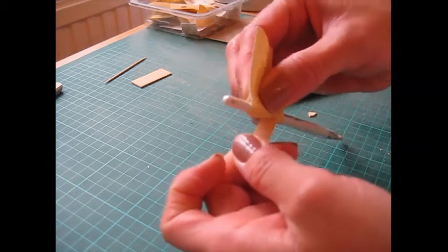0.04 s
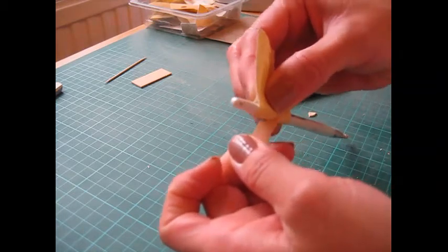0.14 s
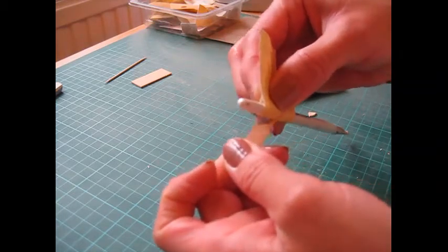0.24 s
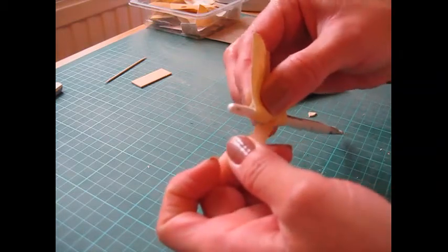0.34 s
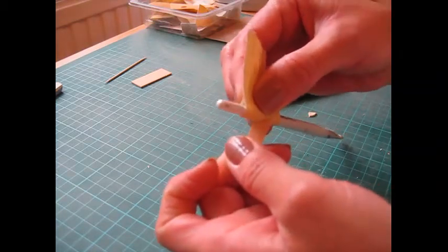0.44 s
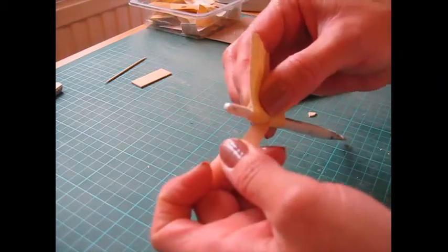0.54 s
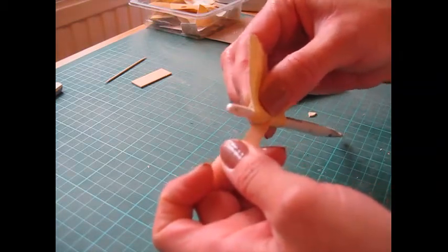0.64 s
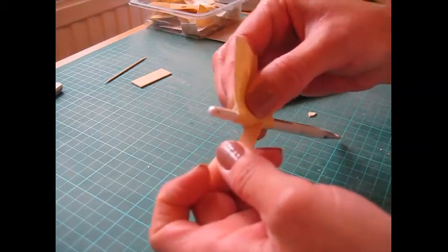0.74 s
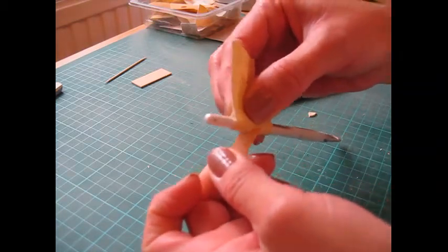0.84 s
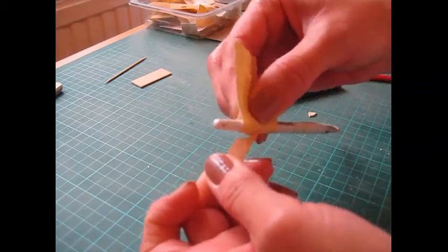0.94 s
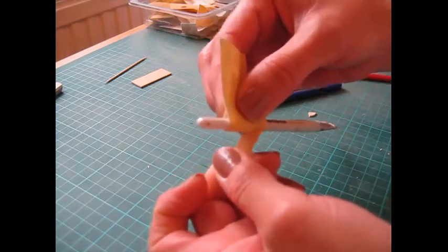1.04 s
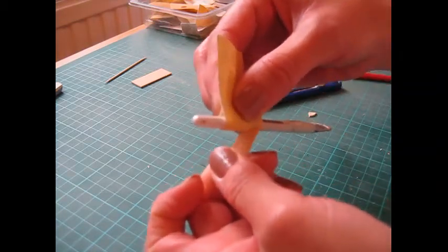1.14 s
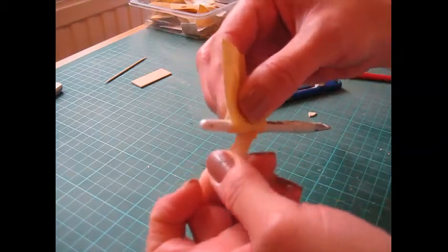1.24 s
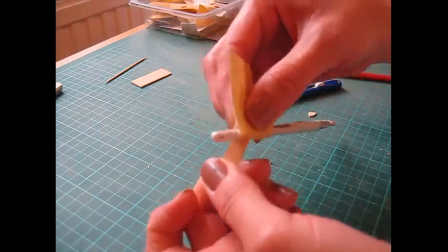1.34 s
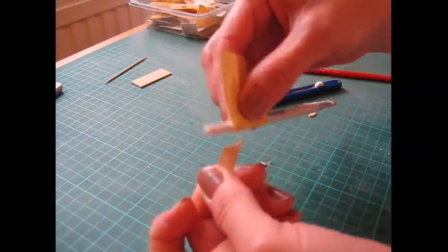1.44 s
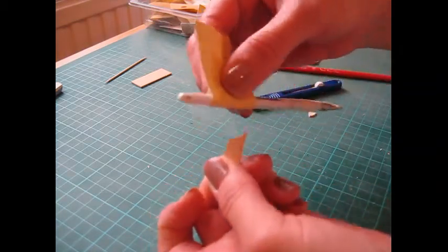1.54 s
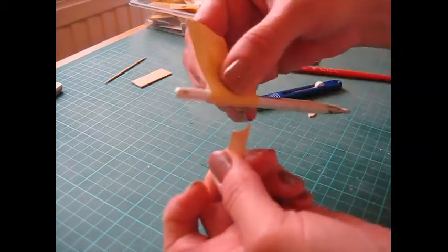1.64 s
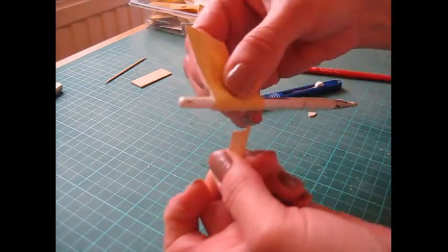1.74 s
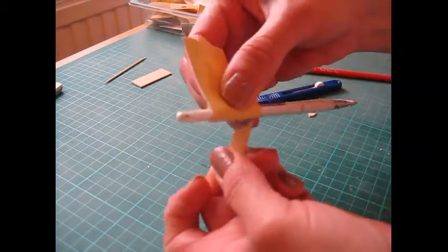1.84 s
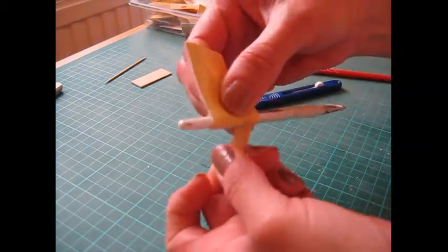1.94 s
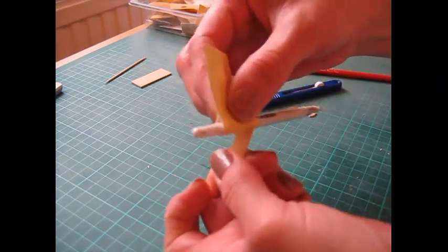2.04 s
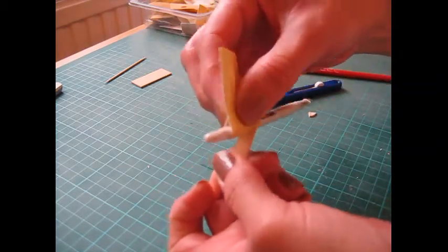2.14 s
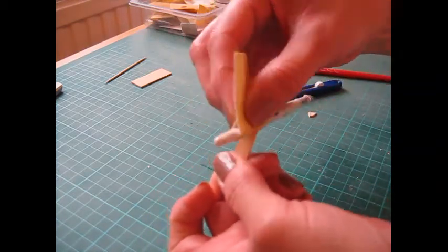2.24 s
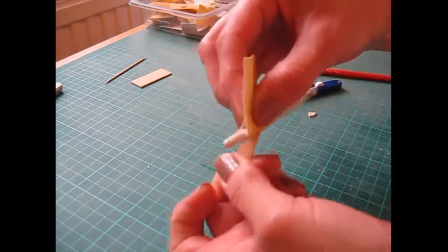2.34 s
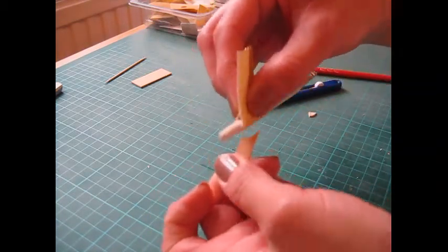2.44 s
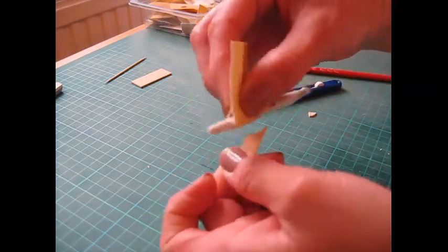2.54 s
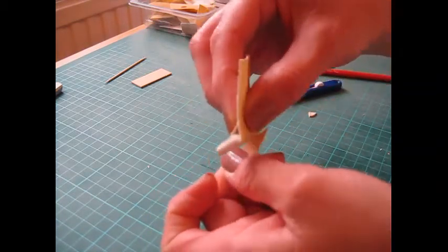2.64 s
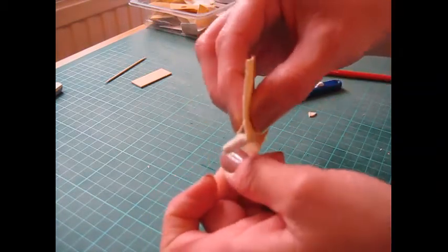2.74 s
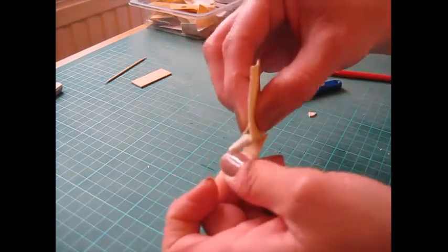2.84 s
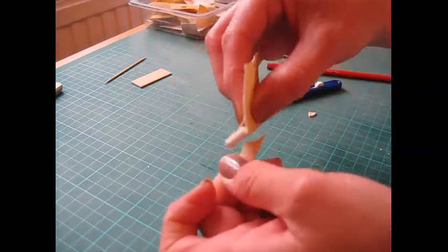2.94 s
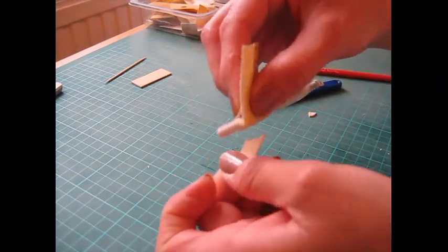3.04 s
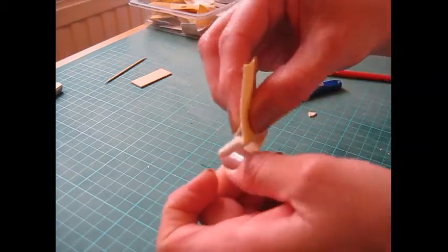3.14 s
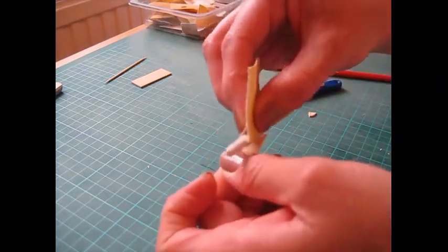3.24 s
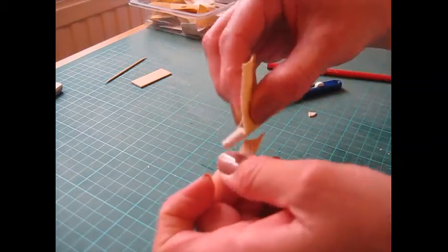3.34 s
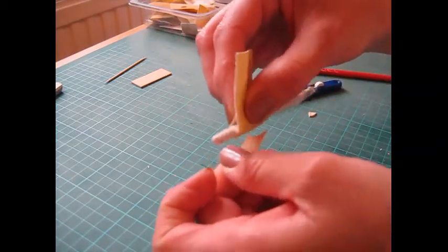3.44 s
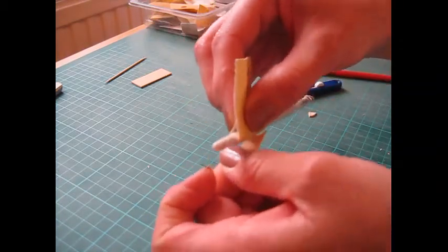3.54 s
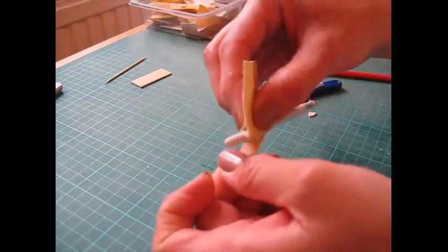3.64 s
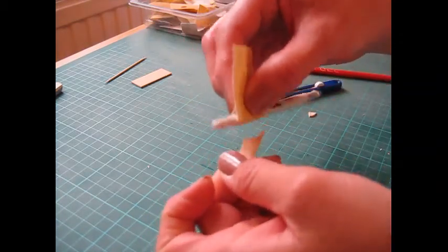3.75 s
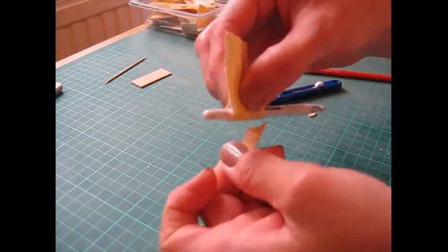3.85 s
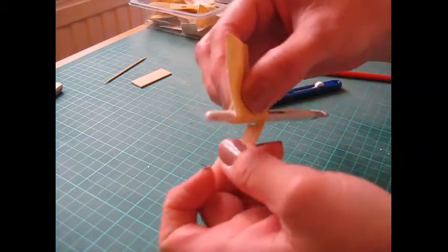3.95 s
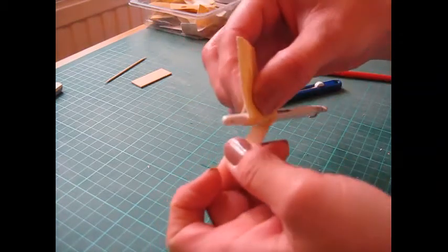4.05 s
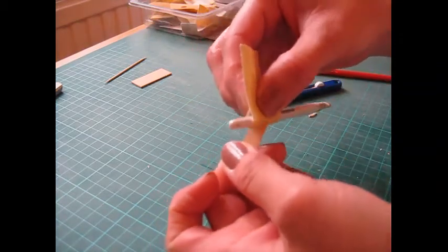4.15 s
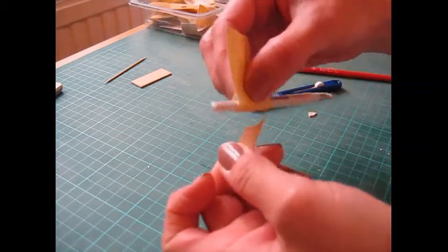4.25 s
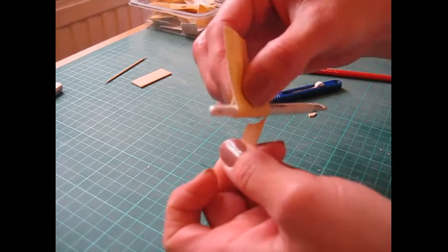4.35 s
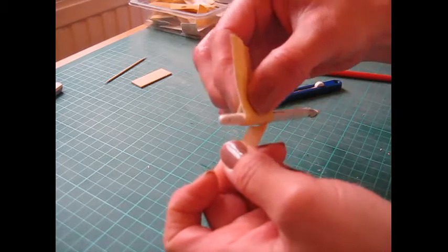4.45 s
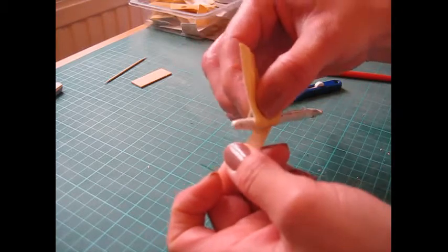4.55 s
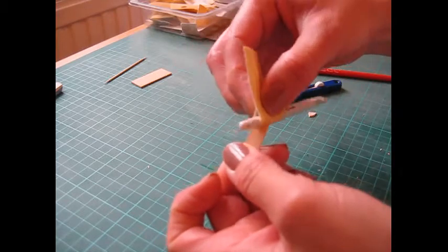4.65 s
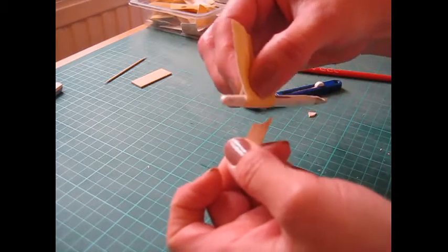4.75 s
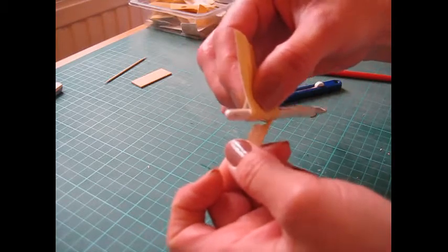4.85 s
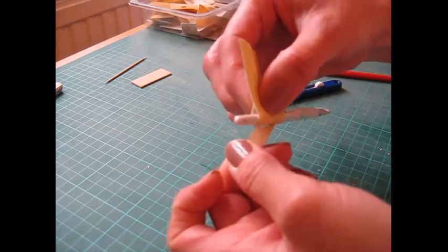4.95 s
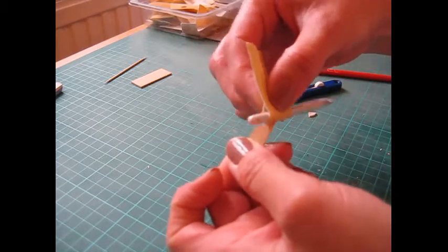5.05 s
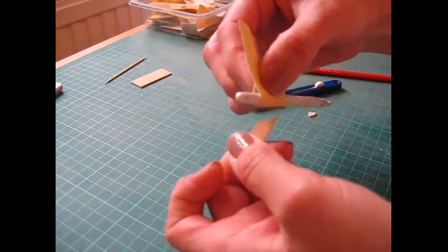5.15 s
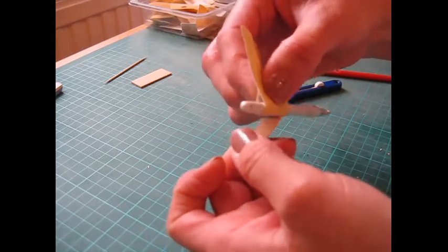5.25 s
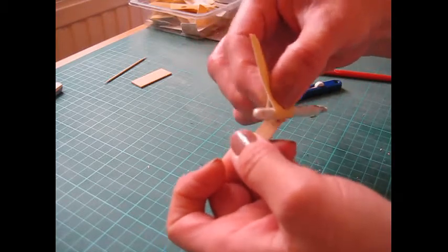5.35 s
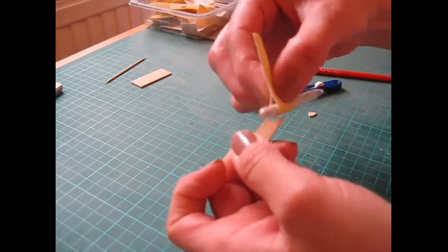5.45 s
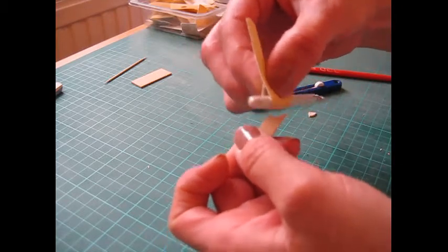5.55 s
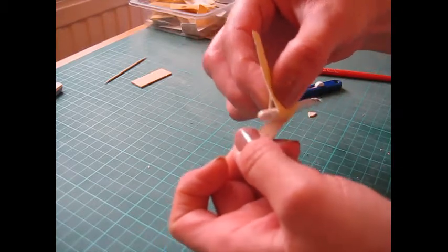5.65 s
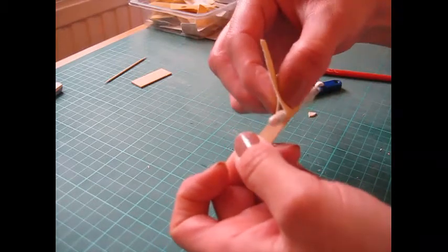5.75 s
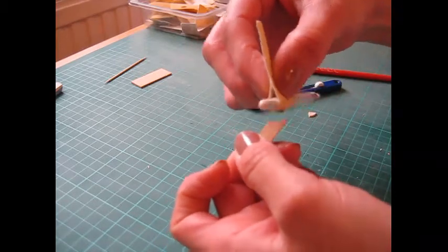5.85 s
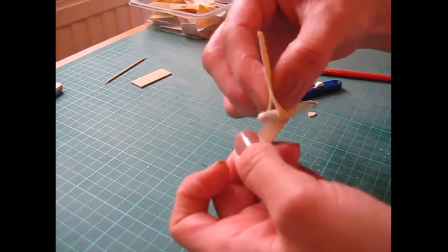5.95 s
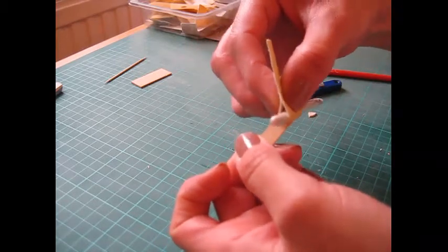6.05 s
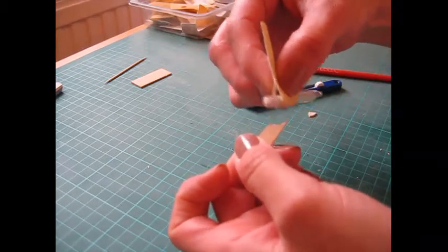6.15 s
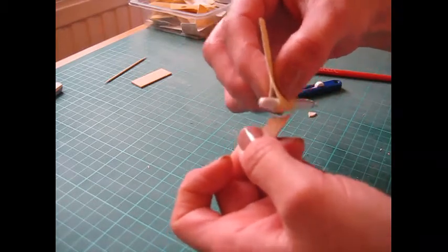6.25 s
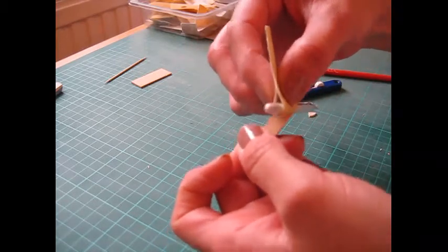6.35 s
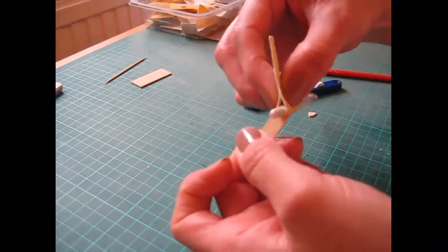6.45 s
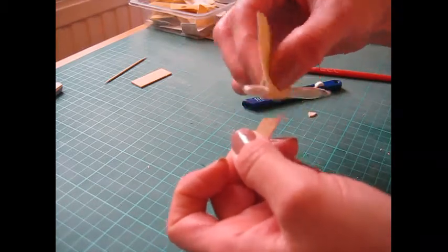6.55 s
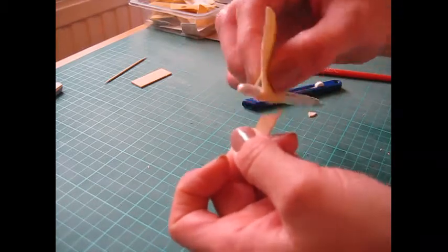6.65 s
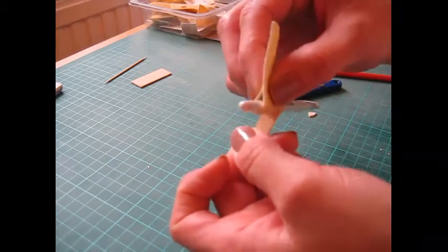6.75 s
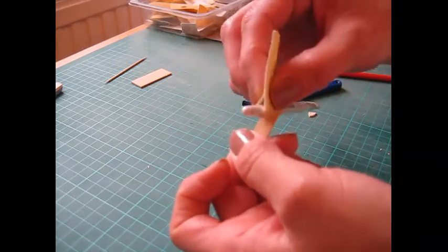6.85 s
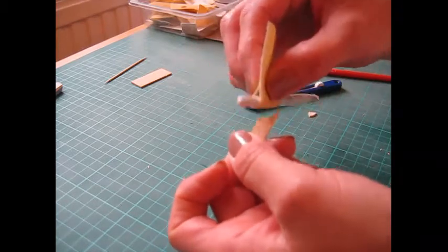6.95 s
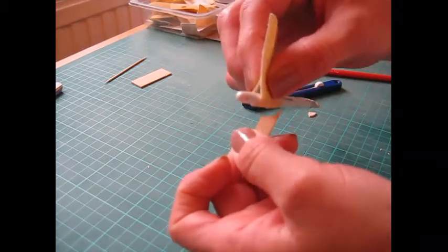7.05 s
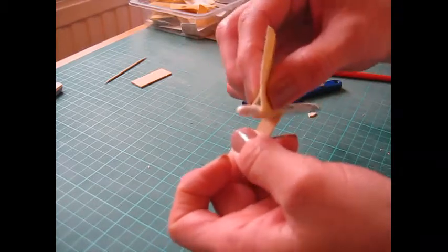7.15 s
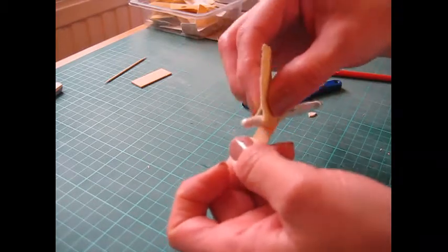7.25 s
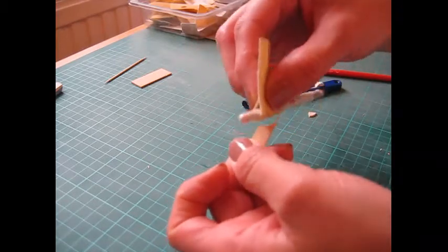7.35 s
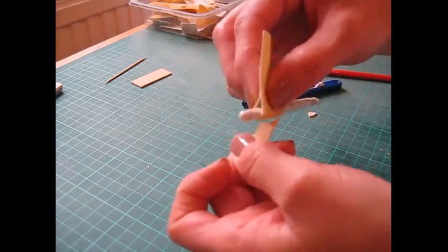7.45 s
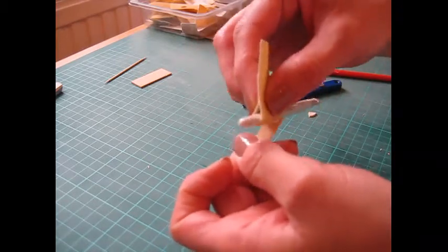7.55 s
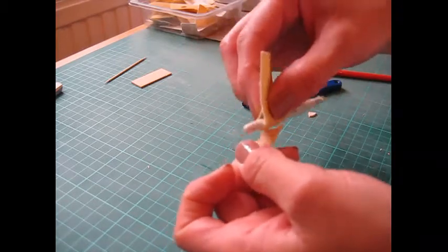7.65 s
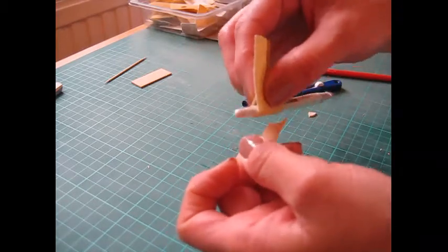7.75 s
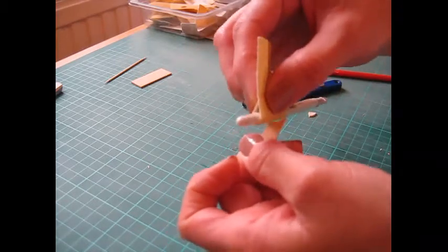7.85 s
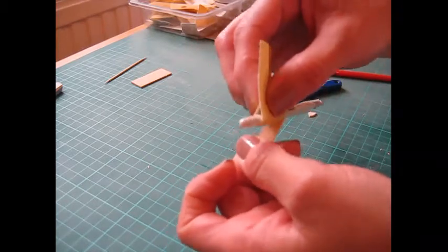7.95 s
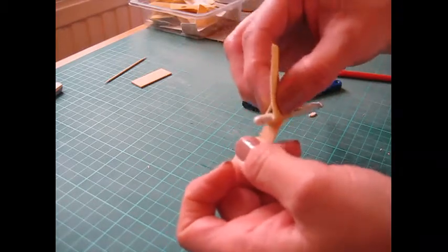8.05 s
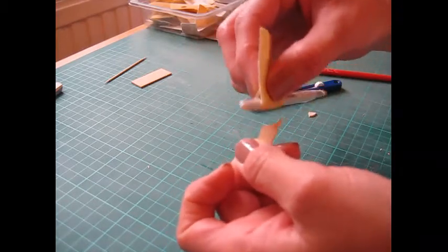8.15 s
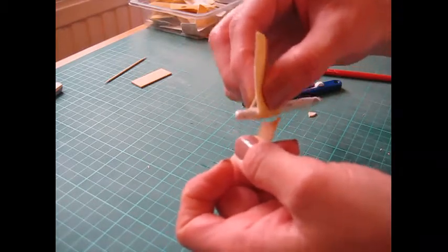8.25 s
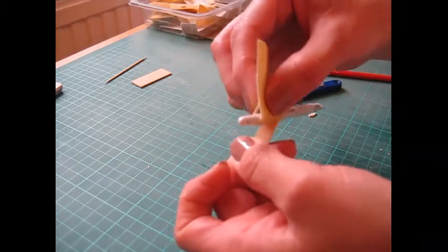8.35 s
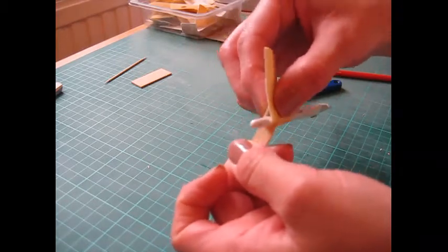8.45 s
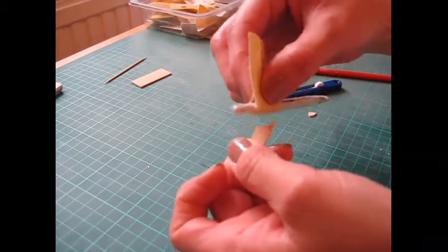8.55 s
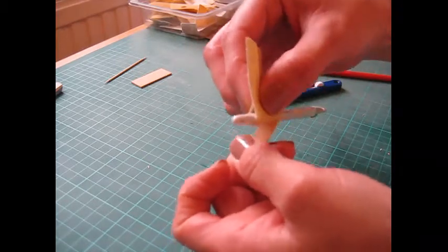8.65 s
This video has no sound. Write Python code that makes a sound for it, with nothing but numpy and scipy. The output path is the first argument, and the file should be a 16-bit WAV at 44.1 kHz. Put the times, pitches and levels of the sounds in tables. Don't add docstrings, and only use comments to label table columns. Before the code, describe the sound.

Hand sanding at an indoor craft table: light gritty touches, two firmer scrapes, a pause with scattered crackles, then repeated brief scratchy strokes, each about a fifth of a second. Some start with crisp snaps, and two small dull taps occur midway. The sound is close, thin, papery and woody, with little room tail, and low camera hiss fills the gaps.

```python
import sys
import numpy as np
from scipy import signal
from scipy.fft import rfft, irfft
from scipy.io import wavfile
from scipy.ndimage import uniform_filter1d, minimum_filter1d, map_coordinates

SR = 44100
rng = np.random.default_rng(int(sys.argv[2]) if len(sys.argv) > 2 else 0)


def boost_factor(decibels):
    exponent = np.asarray(decibels, float) / 20
    return 10 ** exponent


def output_pcm(signal):
    pcm = np.clip(np.atleast_2d(signal).T, -1, 1) * 32767
    wavfile.write(sys.argv[1], SR, np.round(pcm).astype(np.int16))


N = 383229

# hz, level_db
HISS_HZ_DB = [(20, -3), (120, 0.5), (260, 1), (430, 0), (1260, -3), (3000, -7), (7000, -13), (10500, -15.5),
              (15700, -16.5)]
# time_s, peak_db
SNAPS = [(0.987, -22), (1.0152, -25), (1.0776, -23), (1.0967, -21), (1.201, -23), (2.1328, -14.5),
         (2.1512, -17.5), (2.169, -22), (2.1918, -21), (2.196, -19), (2.2275, -23), (2.2395, -11.5),
         (2.2697, -12), (2.2974, -12.5), (2.3026, -9), (2.319, -11), (2.3282, -10.5), (2.351, -26),
         (2.7545, -20.5), (3.954, -11.5), (3.9701, -11.5), (4.4296, -13.5), (4.447, -11.5), (4.8979, -16),
         (4.9082, -14.5), (5.3142, -26), (5.367, -14), (5.6422, -15), (6.32, -31), (7.3022, -22),
         (0.001, -34), (0.0099, -26.5), (0.388, -20.5), (0.42, -34), (1.1785, -33), (1.9311, -38),
         (1.9455, -34), (2.042, -34), (2.051, -31.5), (2.06, -38), (2.089, -30.5), (2.12, -42),
         (3.047, -41), (3.142, -41), (3.163, -28.5), (3.446, -44), (3.503, -37), (5.239, -38), (5.298, -23),
         (5.905, -35.5), (6.3078, -24.5), (6.595, -39), (6.755, -20), (7.0983, -36), (7.1284, -32),
         (7.897, -33), (8.2804, -33.5), (8.646, -39)]
# start_s, end_s, grain_count, typical_peak_db
CRACKLES = [
    (.391, .43, 5, -30),
    (.72, .77, 7, -28),
    (1.072, 1.082, 2, -20),
    (2.205, 2.255, 5, -19),
    (2.333, 2.348, 2, -16),
    (3.963, 3.985, 4, -15),
    (3.988, 4.03, 6, -26),
    (4.432, 4.5, 11, -17),
    (4.91, 4.915, 1, -17.5),
]
# start_s, end_s, pressure_db, landing_rel_db, gather_s
RUBS = [(0.104, 0.262, -57.5, 6, 0.022), (0.309, 0.356, -44.5, -9.5, 0.028),
        (0.356, 0.431, -55.5, 5.5, .02), (0.482, 0.587, -64, 17, 0.054), (0.668, 0.764, -56, -5, 0.016),
        (0.816, 0.934, -55, -12, 0.044), (1.636, 1.662, -45, 2, .01), (1.945, 1.961, -46, -12, 0.0082),
        (2.129, 2.315, -36, -7, 0.15), (2.658, 2.729, -43.5, -3.5, .03), (3.953, 4.03, -48.5, 8.5, 0.06),
        (7.473, 7.513, -64.5, 5, .02)]
# start_s, end_s, pressure_db, landing_rel_db, gather_s
STROKES = [(0.982, 1.089, -35, -16, .05), (1.166, 1.385, -31, -24.5, 0.051),
           (2.332, 2.422, -33.5, -4, 0.01), (2.752, 2.935, -35.5, -13.5, 0.032),
           (3.161, 3.338, -37.5, -24, 0.033), (3.543, 3.71, -36.5, -14, 0.022),
           (4.029, 4.204, -34, -18, 0.018), (4.431, 4.671, -31.5, -19, 0.073),
           (4.904, 5.075, -35, -8, 0.036), (5.302, 5.439, -38.5, -9, 0.019),
           (5.636, 5.77, -38.5, -7.5, 0.013), (5.957, 6.113, -38.5, -10, 0.028),
           (6.31, 6.478, -35.5, -4, 0.031), (6.702, 6.911, -35.5, -22, 0.062),
           (7.132, 7.302, -36, -5, 0.02), (7.515, 7.685, -37.5, -10.5, 0.0073),
           (7.902, 8.094, -34.5, -14, 0.024), (8.316, 8.487, -34.5, -11, 0.037)]
# grit_fizz_db, paper_ring_db, low_stick_mode_db, high_stick_mode_db
GRIPS = [(10.5, 1, 1, -1.5), (10.5, 0.5, -1, -3), (6.5, -2, -8.5, 2), (12.5, 0, -15, -1.5), (9, 0, -16, -2),
         (16, 5, -6, -12), (-3, -5.5, -5, 6), (5.5, 2, 2, 1), (1.5, 0.5, -5.5, -4), (-1.5, 0, -17, 9),
         (5, -2, -13, -6), (9, 2.5, -2.5, 1.5), (10.5, 3, 0, -4), (4.5, 1.2, 0.2, -8), (3.5, -0.5, -2, -16),
         (4, 1.5, -12, 1.5), (4, 1.5, -11, 5.5), (3.5, -2.5, -26, 2.5), (5, 1.5, -0.5, -15),
         (6, 0.8, -2, -19), (8.5, 2, -3, -8), (11, 3.5, 0.5, -8), (10.3, 3, 0, -7), (10.5, 1.7, 0.5, -9),
         (9, 2, 3.5, 0.5), (6, 1.5, 1, -5), (6.5, 0, -4.5, -4), (8, -0.5, -8, -2), (6, -0.5, -4, -2.5),
         (4.5, 1.2, -6, -6)]
# fizz_top_db, fizz_gain_by_end_db, lift_off_rel_db, pen_body_db
WRISTS = [(-4, -1, -8, 3), (-2, 7, -4, 3), (0, -2, -14, 0), (-8, 13, -10, 0.3), (-8, -10, -15, 6),
          (-12, -3, -11, 3), (0.1, 0.1, -9, -5), (-6, 0.1, -5.5, -2), (-5, 16, -17, -2.5),
          (-2, -5, -7, -2.5), (-1, 5, -31, 1), (-6, -5, -4, 2), (-6, -17, -7.5, 6.5), (-7, 1, -8.5, 1),
          (-7, -2, -13.5, -2), (-1, 5, -9, -2.8), (3, 8, -5.5, -2), (2.5, 6.5, -6, -3.5),
          (-4.5, -2.5, -5, -2.1), (-1, -8.5, -18, -3), (0.5, -3.5, -7, -2.7), (2.5, -4, -15, -1.7),
          (1.5, -1, -10, -1), (3.5, -2.5, -13.5, 0), (2.5, 0, -13.5, 0), (0.5, 4, -6.5, 1.5),
          (1, 7.5, -13.5, 1.5), (3, 8.5, -14, 2.5), (1.5, 0.5, -12.5, -1), (-3.5, 1, -12, -2.2)]
# at_speed_db, extra_landing_db, extra_lifting_db
PAPER_MIX_DB = (-0.3, 1.5, 3.5)
FIZZ_MIX_DB = (0.1, 0.5, 1)
PEN_MIX_DB = (-10, 6.5, 11)
# centre_hz, width_hz, level_db
STICK_MODES = [(2955, 620, -0.5), (3722, 1110, 1.5), (4410, 850, 0)]
PAPER_MODES = [(4994, 1020, -1), (5990, 2200, 0), (7300, 2130, -9.5)]
GRIT_MODES = [(9330, 2960, 1), (10870, 5000, 5.5), (12320, 1100, 4), (14200, 5300, -8.5), (14640, 2660, 5)]
PEN_MODES = [(1030, 440, -11), (1745, 910, -1.5), (2248, 700, 1)]
# start_s, length_s
LOST = [(0.37, 0.018), (0.48, 0.02), (0.536, 0.034), (2.092, .016), (2.715, 0.024), (3.342, 0.023),
        (3.783, 0.023), (4.104, 0.019), (4.175, 0.021), (4.331, 0.024), (4.759, 0.02), (4.915, 0.021),
        (5.986, 0.025), (6.048, 0.031), (7.539, 0.038), (8.053, 0.019), (8.215, 0.027)]
# centre_hz, width_hz, depth_0_to_1
DIPS = [
    (5530, 280, .85),
    (2820, 260, 0.25),
]
# time_s, level_db
KNOCKS = [
    (4.458, -14.5),
    (5.3676, -18.5),
]

EDGE_HZ = 15790


def evened(x):
    return x / np.sqrt(np.mean(x ** 2) + 1e-20)


def slow(size):
    noise = rng.standard_normal(N)
    return evened(uniform_filter1d(uniform_filter1d(noise, size), size))


def hiss(level_db=-55):
    hz = np.fft.rfftfreq(N, 1 / SR)
    colour_hz, colour_db = np.transpose(HISS_HZ_DB)
    noise = rng.standard_normal(N) * boost_factor(0.52 * slow(size=60) + 1.47 * slow(size=4000))
    colour = boost_factor(np.interp(np.log(hz + 1), np.log(colour_hz + 1), colour_db))
    return boost_factor(level_db) * evened(irfft(rfft(noise) * colour, N))


def grains(crackle_spread_db=1.5):
    rows = SNAPS
    for start_s, end_s, count, typical_db in CRACKLES:
        count = round(count)
        jitter, size = rng.random(count), rng.standard_normal(count)
        times_s = start_s + (end_s - start_s) * (np.arange(count) + 0.45 * jitter) / count
        rows = rows + list(zip(times_s, typical_db + crackle_spread_db * size))
    return rows


def snaps():
    push, rows = np.zeros((4, N + 200)), grains()
    t = np.arange(200) / SR
    for (time_s, peak_db), rattle in zip(rows, rng.standard_normal((len(rows), 4, 200))):
        burst = 0.3 * rattle * np.exp(-t / 0.00043) + (t == 0)
        push[:, round(time_s * SR):][:, :200] += boost_factor(peak_db) * burst
    body_db = np.array([[-1.5], [-3], [3], [-11]])
    return push[:, :N] * boost_factor(body_db)


def ring(x, modes, grip_db):
    hz = np.fft.rfftfreq(1024, 1 / SR)
    power = 0
    for (centre_hz, width_hz, level_db), extra_db in zip(modes, grip_db):
        power = power + boost_factor(level_db + extra_db) ** 2 / (1 + (2 * (hz - centre_hz) / width_hz) ** 2) ** 3
    cepstrum = irfft(np.log(power) / 2)
    cepstrum[1:512] *= 2
    cepstrum[513:] = 0
    kernel = irfft(np.exp(rfft(cepstrum)))
    return signal.oaconvolve(x, kernel / np.linalg.norm(kernel))[:len(x)]


def bodies(push):
    low_paper_share = 0.2
    pen_low_share = 1
    rows, out = sorted(zip(RUBS + STROKES, GRIPS, WRISTS)), np.zeros(N)
    middles = [round((one[0][1] + following[0][0]) / 2 * SR) for one, following in zip(rows, rows[1:])]
    borders = [0] + middles + [N]
    lags = rng.uniform(25, 110, (len(rows), 2, 1))
    for a, b, lag, (_, grip, wrist) in zip(borders, borders[1:], lags, rows):
        *_, low_db, high_db = grip
        top_db, *_, pen_db = wrist
        grips_db = ((low_db, 0, high_db), (low_paper_share * low_db, 0, 0),
                    (0, 0, top_db / 2, top_db, top_db), (pen_low_share * pen_db, 0, 0))
        modes = STICK_MODES, PAPER_MODES, GRIT_MODES, PEN_MODES
        direct = sum(ring(p[a:b], m, g) for p, m, g in zip(push, modes, grips_db))
        late = np.arange(b - a) - lag * (1 + .35 * (np.linspace(0, 1, b - a) - .5))
        echoes = [map_coordinates(direct, [n], order=3) for n in late]
        out[a:b] = 0.87 * direct + 0.215 * (echoes[0] - echoes[1])
    return out


def room(x, t60_s=0.154):
    t = np.arange(SR // 3) / SR
    tail = rng.standard_normal(len(t)) * boost_factor(-60 * t / t60_s) * (t > .002)
    tail = signal.lfilter([1], [1, -.25], tail)
    return signal.fftconvolve(x, tail / np.linalg.norm(tail))[:N]


def spill(x, jump_db=14, open_s=0.012, level_db=-7):
    power_db = 10 * np.log10(uniform_filter1d(x ** 2, size=128) + 1e-12)
    before_db = -minimum_filter1d(-power_db, size=600, origin=299)
    jump = (power_db[150:] - before_db[:-150] > jump_db) * 1.
    held = signal.oaconvolve(jump, np.ones(round(open_s * SR)))[:N]
    gate = uniform_filter1d(np.minimum(held, 1), size=100)
    top = signal.oaconvolve(x, signal.firwin(511, EDGE_HZ, pass_zero=False, fs=SR), "same")
    return boost_factor(level_db) * gate * top


def stroke_controls():
    gather_power = 1.7
    lift_s, drag_s = 0.012, 0.048
    uneven_run, uneven_land, uneven_lift = 0.25, 1, 0.56
    paper_fade_db = -3
    controls, contact = np.zeros((5, N)), np.zeros(N)
    for stroke, grip, wrist in zip(RUBS + STROKES, GRIPS, WRISTS):
        start_s, end_s, press_db, land_db, gather_s = stroke
        fizz_db, paper_db, *_ = grip
        _, gained_db, lift_db, pen_db = wrist
        on = slice(max(round(start_s * SR) - 100, 0), round(end_s * SR) + 100)
        t = np.clip(np.arange(on.start, on.stop) / SR, start_s, end_s)
        landing = np.exp(-((t - start_s) / gather_s) ** gather_power)
        lifting = np.exp((t - end_s) / lift_s)
        along = (t - start_s) / (end_s - start_s) - .5

        def mix(run, land, lift):
            return run + land * landing + lift * lifting

        controls[:, on] = [
            mix(press_db, land_db, lift_db),
            paper_db + mix(*PAPER_MIX_DB) + paper_fade_db * along,
            fizz_db + mix(*FIZZ_MIX_DB) + gained_db * along,
            pen_db + mix(*PEN_MIX_DB),
            mix(uneven_run, uneven_land * min(gather_s / drag_s, 1), uneven_lift)]
        contact[round(start_s * SR):round(end_s * SR)] = 1
    return *controls, uniform_filter1d(contact, size=160)


def scrape(catch_ms=0.37):
    stick_db, paper_db, fizz_db, pen_db, uneven, contact = stroke_controls()
    uneven = np.clip(uneven, 0, 1.6)
    chance = np.repeat(rng.standard_normal(N // 12 + 1), 12)[:N].clip(-3, 3)
    power = np.exp(2 * uneven * chance - 2 * uneven ** 2)
    decay = np.exp(-1000 / (catch_ms * SR))
    bursts = np.sqrt(signal.lfilter([1 - decay], [1, -decay], power))
    catches = bursts * contact * boost_factor(stick_db + 0.27 * slow(size=150))
    return np.array([catches * boost_factor(db + 0.76 * slow(size=500)) * rng.standard_normal(N)
                     for db in (0, paper_db, fizz_db, pen_db)])


def prolonged(past, count, size=13):
    z = rfft(past * np.hanning(len(past)), 8192)
    tops = signal.find_peaks(abs(z), distance=65)[0]
    weight = abs(z) * (np.arange(len(z)) + 50) ** .2
    tops = tops[np.argsort(-weight[tops])[:size]]
    n = np.arange(count)[:, None] + len(past)
    tones = (abs(z[tops]) * np.cos(2 * np.pi * tops * n / 8192 + np.angle(z[tops]))).sum(1)
    return evened(tones) * np.std(past) * boost_factor(2.0 - 70 * np.arange(count) / SR)


def mended(x, size=224):
    out = x.copy()
    for start_s, length_s in LOST:
        a, b = round(start_s * SR), round((start_s + length_s) * SR)
        fade = np.linspace(0, np.pi / 2, b - a)
        before = prolonged(x[a - size:a], count=b - a)
        after = prolonged(x[b:b + size][::-1], count=b - a)[::-1]
        bridge = np.cos(fade) * before + np.sin(fade) * after
        share = 0.84 * signal.windows.tukey(b - a, min(0.0086 / length_s, 1))
        out[a:b] = share * bridge + (1 - share) * x[a:b]
    return out


def pointing(x, from_s=2.55, to_s=3.85):
    out, on = x.copy(), slice(round(from_s * SR), round(to_s * SR))
    for hz, width_hz, depth in DIPS:
        peak = signal.lfilter(*signal.iirpeak(hz, hz / width_hz, SR), out[on])
        out[on] -= np.clip(depth, 0, 1) * peak
    return out


def knocks():
    out, t = np.zeros(N), np.arange(200) / SR
    for time_s, level_db in KNOCKS:
        out[round(time_s * SR):][:200] += boost_factor(level_db) * (t / 0.00019) * np.exp(-t / 0.000096)
    return out


def scene():
    near = pointing(bodies(scrape() + snaps())) + knocks()
    return (near + boost_factor(-15.0) * room(near) + hiss())[None]


def low_pass(x):
    return signal.sosfilt(signal.butter(12, 17060, fs=SR, output="sos"), x)


def record(dry):
    hz = np.fft.rfftfreq(8192, 1 / SR)
    edge = np.where(hz < EDGE_HZ, 1, boost_factor(-55 - .03 * (hz - EDGE_HZ)))
    band = signal.firwin2(2047, hz, edge * (hz < SR / 2), fs=SR)
    notch_hz, notch_q = 7875, 6.5
    x = signal.lfilter(*signal.iirnotch(notch_hz, notch_q, SR), dry[0])
    x = mended(signal.oaconvolve(x, band, "same") + spill(x))
    return low_pass(x[None])


dry = scene()
out = record(dry)
output_pcm(out)
```